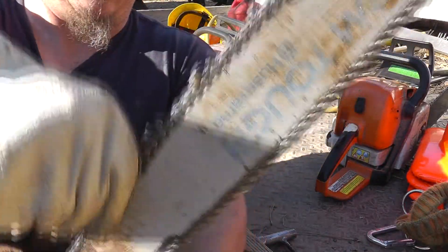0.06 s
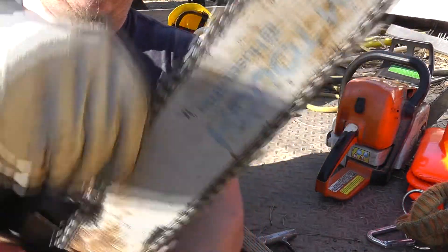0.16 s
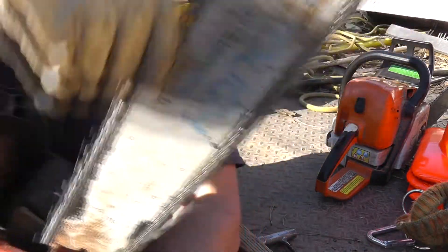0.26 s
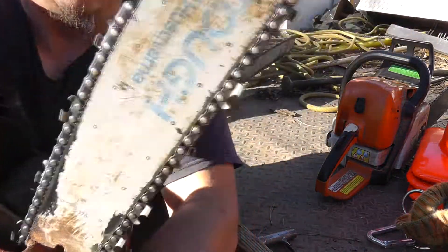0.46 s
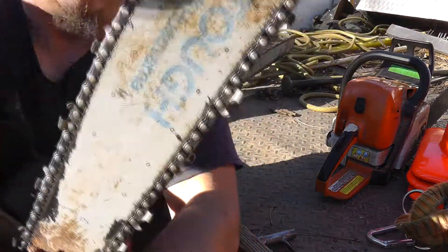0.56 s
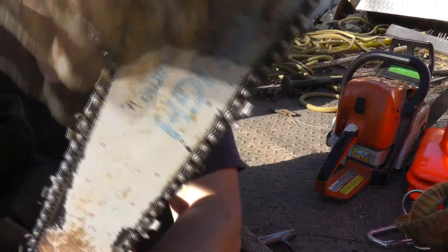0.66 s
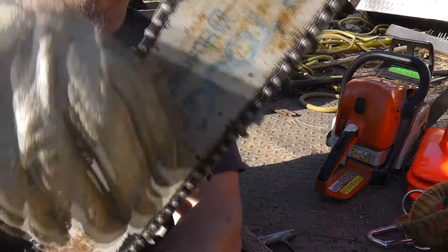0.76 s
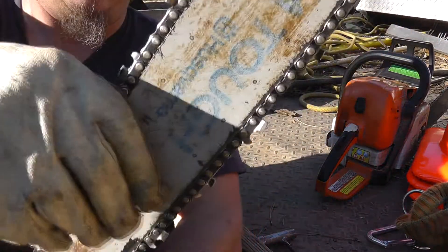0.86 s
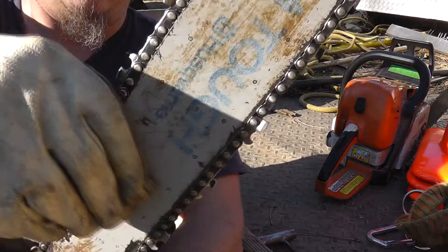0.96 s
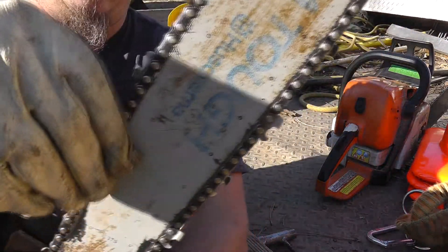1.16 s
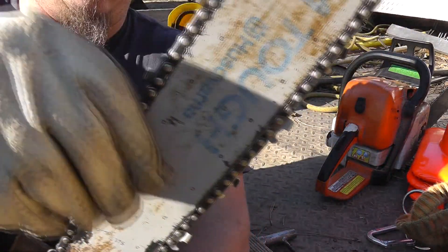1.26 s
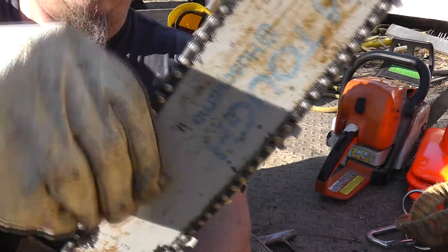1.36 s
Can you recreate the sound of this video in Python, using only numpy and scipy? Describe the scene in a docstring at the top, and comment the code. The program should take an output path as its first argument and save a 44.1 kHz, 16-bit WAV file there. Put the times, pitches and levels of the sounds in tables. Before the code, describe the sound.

A saw chain is pulled once along its steel bar, close up outdoors, in a short rattle of rapid clicks and ringing scrapes. It settles with faint knocks, then a leather glove slides softly along the bar.

```python
"""A saw chain is pulled once along its guide bar by a gloved hand, outdoors and close up.
The dragged chain scrapes in the groove and rings the steel bar. Its links tick over the sprocket,
slack links slap the rail, and jerks thump the bar. The chain settles with a few soft knocks,
then the leather glove slides softly back along the bar over a quiet background."""
import sys
import numpy as np
from scipy import signal
from scipy.fft import rfft, irfft
from scipy.io import wavfile

SR = 44100
rng = np.random.default_rng(int(sys.argv[2]) if len(sys.argv) > 2 else 0)


def log_audio(samples):
    """Write samples as a 16-bit WAV file to the path given in sys.argv[1]."""
    # one column per channel
    frames = np.atleast_2d(samples).T
    # limit to full scale, then quantise
    limited = np.clip(frames, -1, 1)
    pcm = np.round(limited * 32767).astype(np.int16)
    wavfile.write(sys.argv[1], SR, pcm)


N = 61739
T = np.arange(N) / SR
FFT_SIZE = 2 * N
HZ = np.maximum(np.arange(N + 1) * SR / FFT_SIZE, 1)


def from_db(db):
    return 10 ** (np.asarray(db) / 20)


def rms_one(x):
    return x / np.sqrt(np.mean(x ** 2) + 1e-20)


def level(rows):
    """Gain over time from (s, dB) points."""
    return from_db(np.interp(T, *np.transpose(rows)))


def by_hz(points):
    """Values at every frequency from (Hz, value) points."""
    hz, value = np.transpose(points)
    return np.interp(np.log(HZ), np.log(hz), value)


def shape(x, gain):
    """Filter by a gain per frequency."""
    return irfft(rfft(x, FFT_SIZE) * gain, FFT_SIZE)[..., :N]


def colour(x, points):
    """Causal filter from (Hz, dB) points; white noise keeps its power."""
    gain = rms_one(from_db(by_hz(points)))
    cepstrum = irfft(np.log(gain), FFT_SIZE)
    causal = cepstrum[:N] * np.where(np.arange(N), 2, 1)
    return shape(x, np.exp(rfft(causal, FFT_SIZE)))


def ring(x, modes):
    """Each (Hz, dB, T60 s) mode rings as a dying sine; signs alternate."""
    out = 0
    for k, (hz, db, t60) in enumerate(modes):
        r, w = np.exp(-np.log(1000) / (t60 * SR)), 2 * np.pi * hz / SR
        mode = signal.lfilter([0, np.sin(w)], [1, -2 * r * np.cos(w), r * r], x + 1e-18)
        out = out + (-1) ** k * from_db(db) * mode
    return out


def impulses(rows, delay_s=0):
    """One impulse per (s, dB) row."""
    start_s, db = np.transpose(rows)
    samples = np.clip((start_s + delay_s) * SR, 0, N - 1).astype(int)
    return np.bincount(samples, from_db(db), N)


def convolve(x, response):
    return signal.fftconvolve(x, response)[:N]


def grains(rate_per_s=4000, spread_db=2):
    """Dense tiny collisions of uneven size; rms 1."""
    sizes = from_db(spread_db * np.minimum(rng.exponential(1, N), 4))
    signs = rng.choice([-1, 1], N)
    return rms_one(sizes * signs * (rng.random(N) < rate_per_s / SR))


def stereo_noise(spectrum, correlation):
    """Noise with a given spectrum and left-right correlation."""
    alike = np.clip(by_hz(correlation), -1, 1)
    mid, side = rng.standard_normal((2, N))
    mid = shape(mid, np.sqrt((1 + alike) / 2))
    side = shape(side, np.sqrt((1 - alike) / 2))
    return colour(mid + side * [[1], [-1]], spectrum)


# Drag force in the groove. Each row: time in seconds, level in dB.
DRAG_FORCE = [(0, -33), (.13, -24), (.21, -16.5), (.245, -9.5), (.308, -7), (.325, 0.5), (.40, -4),
              (.46, -1.5), (.505, -3.5), (.532, -10.5), (.555, -25.5), (.61, -38), (.67, -49), (1.4, -61)]
# Guide bar modes. Each row: frequency in Hz, gain in dB, T60 in seconds.
BAR_MODES = [(336.6, -15.5, 0.23), (503.3, -2, 0.088), (522.4, -4, 0.14), (583.4, -4.5, 0.092),
             (612.5, -3, 0.11), (759, -3.5, 0.063), (871, -1, 0.023), (1259, -6, 0.072), (1762, -9, 0.041),
             (2000, -11.5, 0.26), (2195, -21, 0.022), (2487, -14, 0.081), (2757, -4.5, 0.035),
             (2857, -18.5, 0.053)]
# Scrape spectrum. Each row: frequency in Hz, gain in dB.
SCRAPE_EQ = [(40, -51), (100, -36.5), (280, -22), (400, -9.5), (520, 3.5), (700, -1), (1000, -8),
             (1500, -15), (2100, -7), (3200, -18), (4200, -18.5), (7000, -19), (10000, -30.5), (16000, -33)]
# Steel creeping on steel. Each row: time in seconds, level in dB.
SIZZLE_LEVEL = [(0, -91), (.1, -62.5), (.17, -65), (.23, -65.5), (.5, -42.5), (.56, -60.5), (.61, -62.5),
                (.69, -70.5), (.79, -68), (.865, -71), (1.4, -82)]
# Sizzle spectrum. Each row: frequency in Hz, gain in dB.
SIZZLE_EQ = [(100, -50), (1000, 7), (3300, -1.5), (4800, -4), (7500, 4), (10000, -6.5), (16000, -14)]


def chain_drag(ring_db=-34, scrape_db=-33):
    """The chain scrapes and sizzles in the groove; its tiny collisions ring the bar."""
    force = level(DRAG_FORCE)
    bar_gain = np.linalg.norm(ring(signal.unit_impulse(N), BAR_MODES))
    ringing = ring(force * grains(), BAR_MODES) / bar_gain
    scrape = colour(force * grains(), SCRAPE_EQ)
    sizzle = colour(level(SIZZLE_LEVEL) * grains(), SIZZLE_EQ)
    return from_db(ring_db) * ringing + from_db(scrape_db) * scrape + sizzle


# Glove sliding on the bar. Each row: time in seconds, level in dB.
RUB_LEVEL = [(0, -64), (.1, -57.5), (.2, -59.5), (.58, -55.5), (.66, -74), (.868, -80), (.905, -56.5),
             (1.01, -55.5), (1.17, -51), (1.24, -57), (1.32, -62), (1.4, -77)]
# Rub spectrum. Each row: frequency in Hz, gain in dB.
RUB_EQ = [(30, -22), (100, -7), (350, 2.5), (700, 4), (1400, -1), (2600, -3.5), (3500, -1.5), (5500, -12.5),
          (8200, -8.5), (11500, -13.5), (16000, -23)]
# Rub stereo image. Each row: frequency in Hz, left-right correlation.
RUB_CORRELATION = [(100, .3), (500, 0.47), (4000, 1), (8000, 1), (14000, 0)]
# Saw body drone. Each row: time in seconds, level in dB.
DRONE_LEVEL = [(0, -54.5), (.2, -67), (.7, -68.5), (.95, -66.5), (1.15, -56), (1.29, -55.5), (1.4, -61)]
# Saw body modes. Each row: frequency in Hz, gain in dB, T60 in seconds.
BODY_MODES = [(135.7, -6, 0.43), (318, 0.5, 0.05), (393.5, 1.5, 0.062)]


def glove_rub(rough_db=1.0, catch_s=0.004):
    """Leather catches and slips on the steel, hissing and setting the saw's body droning."""
    catching = rms_one(convolve(rng.standard_normal(N), np.exp(-T / catch_s)))
    hiss = level(RUB_LEVEL) * from_db(rough_db * catching) * stereo_noise(RUB_EQ, RUB_CORRELATION)
    drone = level(DRONE_LEVEL) * rms_one(ring(rng.standard_normal(N), BODY_MODES))
    return hiss + drone


# Background spectrum. Each row: frequency in Hz, gain in dB.
BACKGROUND_EQ = [(20, -21), (40, -19), (60, -2), (120, -1.5), (250, -4), (500, -9.5), (1000, -14),
                 (2000, -14), (5000, -31.5), (8000, -31.5), (16000, -29.5)]
# Background stereo image. Each row: frequency in Hz, left-right correlation.
BACKGROUND_CORRELATION = [(50, 0.22), (150, -0.068), (400, -0.18), (2000, 0.86), (6000, 1), (12000, 0.57)]


def background(level_db=-56):
    """Steady, low outdoor noise."""
    return from_db(level_db) * stereo_noise(BACKGROUND_EQ, BACKGROUND_CORRELATION)


# Links dropping onto the sprocket. Each row: start in seconds, level in dB.
LINK_DROPS = [(.1465, -29), (.2315, -14), (.2620, -13), (.2690, -18), (.2988, -13), (.3275, -11),
              (.3435, -4.5), (.3618, 2), (.3806, -5), (.3995, -2.5), (.4183, -3), (.4358, 1.5), (.4543, -1),
              (.4590, -9.5), (.4738, -4), (.4880, -12), (.4980, -7.5), (.5015, -18), (.5155, -25)]
# Tick spectrum. Each row: frequency in Hz, gain in dB.
TICK_EQ = [(100, -68), (1000, -8.5), (3000, 3.5), (4500, -4), (6500, 5), (8300, 2), (11000, -5.5),
           (16000, -11)]
# Modes of a seating link. Each row: frequency in Hz, gain in dB, T60 in seconds.
SEAT_MODES = [(3274, 2, 0.032), (3410, -5.5, 0.029), (3380, -12, 0.06)]


def link_ticks(tick_db=-17.5, graze_db=-16, seat_db=-26.5):
    """Each link grazes a tooth, drops with a bright crack and rings as it seats."""
    attack_s, decay_s, tail_s, tail_db = 0.0003, 0.00052, 0.005, -11
    contacts = impulses(LINK_DROPS) + from_db(graze_db) * impulses(LINK_DROPS, delay_s=-0.0068)
    decay = np.exp(-T / decay_s) + from_db(tail_db) * np.exp(-T / tail_s)
    envelope = (1 - np.exp(-T / attack_s)) * decay
    ticks = colour(convolve(contacts, envelope) * rng.choice([-1, 1], N), TICK_EQ)
    seating = ring(impulses(LINK_DROPS, delay_s=0.0038), SEAT_MODES)
    return from_db(tick_db) * ticks + from_db(seat_db) * seating


# Slack chain hitting the rail. Each row: start in seconds, level in dB, bounces per second.
RAIL_SLAPS = [(.1800, -23, 560), (0.213, -33, 630), (0.257, -22, 500), (.2620, 2.5, 630),
              (0.3283, -8.5, 690), (0.3917, -7.5, 1000), (0.4591, 0, 555), (.5010, -14.5, 530)]
# Slap spectrum. Each row: frequency in Hz, gain in dB.
SLAP_EQ = [(60, -50), (400, -15.5), (900, -6.5), (1350, -4.5), (1600, 3.5), (1950, 4), (2500, 5),
           (3100, -2.5), (3800, -6.5), (5000, -13), (7000, -14.5), (10000, -40), (16000, -44)]
# The bar's long thin ring. Each row: frequency in Hz, gain in dB, T60 in seconds.
SHIVER_MODES = [(1998, 11, 0.7), (2060, -5, 0.39)]


def chain_slaps(slap_db=-6, crunch_db=-25, crunch_s=0.0012, shiver_db=-65):
    """Slack links bounce on the rail, each time with a tiny crunch, and leave the bar ringing."""
    bounces, loss_db = 5, 1.5
    jitter = 0.015 * rng.standard_normal((len(RAIL_SLAPS), bounces))
    hits = impulses([(start_s + (k + late[k]) / rate, db - loss_db * k)
                     for (start_s, db, rate), late in zip(RAIL_SLAPS, jitter) for k in range(bounces)])
    crunch = from_db(crunch_db) * convolve(hits, np.exp(-T / crunch_s)) * rng.standard_normal(N)
    shiver = ring(impulses([row[:2] for row in RAIL_SLAPS]), SHIVER_MODES)
    return from_db(slap_db) * colour(hits + crunch, SLAP_EQ) + from_db(shiver_db) * shiver


# Sideways jerks on the bar. Each row: start in seconds, level in dB.
JERKS = [(.2390, -7), (.3110, -1), (.3215, -1.5), (.3490, 0), (.3950, 5.5), (.4130, 4), (.4475, -1),
         (.4513, 4), (.4655, 3.5), (.4790, -4), (.5080, -2.5)]
# Bar modes damped by the hand holding it. Each row: frequency in Hz, gain in dB, T60 in seconds.
DAMPED_MODES = [(550, -0.5, 0.036), (726, 1, 0.0098)]


def bar_thumps(thump_db=-22, lowpass_hz=900):
    """The chain jerks the bar sideways, giving short hollow thumps."""
    lowpass = signal.butter(2, lowpass_hz, fs=SR, output="sos")
    force = signal.sosfilt(lowpass, impulses(JERKS))
    return from_db(thump_db) * ring(force, DAMPED_MODES)


# Settling chain. Each row: start in seconds, level in dB, frequency in Hz, T60 in seconds.
SETTLING = [(.585, -46.5, 1560, .025), (.607, -46, 310, 0.079), (.728, -47.5, 685, .03),
            (.797, -49, 1160, 0.017)]


def settling_knocks():
    """The chain settles with soft knocks, one mode each."""
    return sum(ring(impulses([(start_s, db)]), [(hz, 0, t60)]) for start_s, db, hz, t60 in SETTLING)


def echoes(x, decay_s):
    """A dying cloud of echoes, different on each side."""
    clouds = rng.standard_normal((2, N)) * np.exp(-T / decay_s)
    return np.array([convolve(x, cloud / np.linalg.norm(cloud)) for cloud in clouds])


# Sideways reflections off nearby things. Each row: frequency in Hz, gain in dB.
NEARBY_EQ = [(200, 5.5), (600, -7), (2500, -13), (5000, -21), (15000, -25)]
# Treble scattered at the microphone. Each row: frequency in Hz, gain in dB.
GLINT_EQ = [(2500, -43), (5000, -35), (9000, -2), (15000, 2)]


def reflections(x, diffuse_db=-15.5):
    """Close scatter, opposite in sign left and right, plus diffuse echoes."""
    nearby = shape(echoes(x, decay_s=0.014)[0], from_db(by_hz(NEARBY_EQ)))
    glint = shape(echoes(x, decay_s=0.00093)[0], from_db(by_hz(GLINT_EQ)))
    diffuse = from_db(diffuse_db) * echoes(x, decay_s=0.013)
    return (nearby + glint) * [[1], [-1]] + diffuse


# Chain balance. Each row: frequency in Hz, left minus right in dB.
CHAIN_BALANCE = [(200, -5), (400, -3), (700, 6.5), (1300, 8.5), (2400, 8.5), (4400, 2.5), (7000, 0),
                 (15000, 1)]


def scene():
    """The chain a little to the left, its reflections, the glove and the background."""
    chain = link_ticks() + chain_slaps() + chain_drag() + bar_thumps() + settling_knocks()
    direct = shape(chain, from_db(by_hz(CHAIN_BALANCE) * [[0.5], [-0.5]]))
    return direct + reflections(chain) + glove_rub() + background()


# Dips in the microphone's response. Each row: frequency in Hz, Q.
MIC_NOTCHES = [(1790, 8.5), (2360, 17.2), (3080, 32)]


def record(dry, cutoff_hz=15800):
    """The microphone's narrow dips, then a steep low-pass."""
    for hz, q in MIC_NOTCHES:
        dry = signal.lfilter(*signal.iirnotch(hz, q, fs=SR), dry)
    return shape(dry, 1 / np.sqrt(1 + (HZ / cutoff_hz) ** 300))


dry = scene()
out = record(dry)
log_audio(out)
```